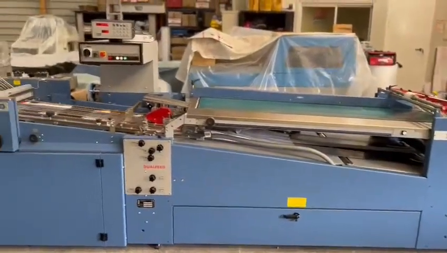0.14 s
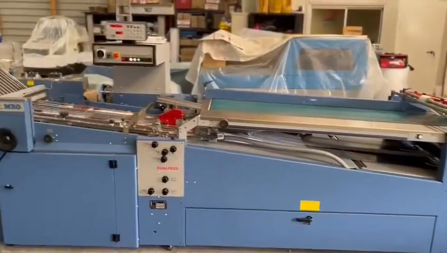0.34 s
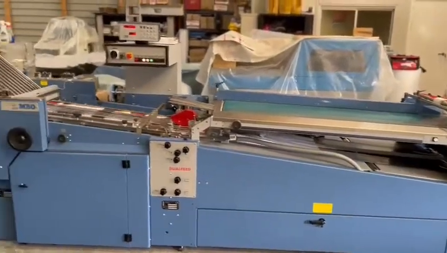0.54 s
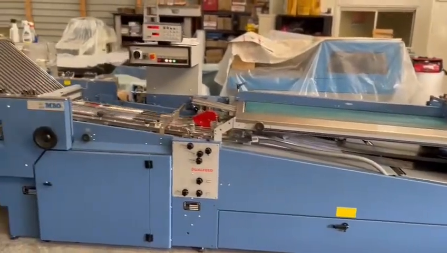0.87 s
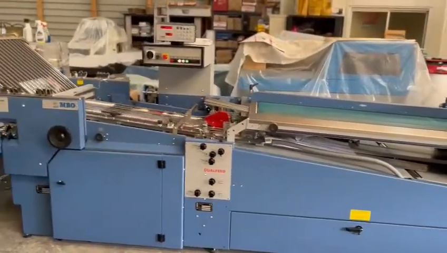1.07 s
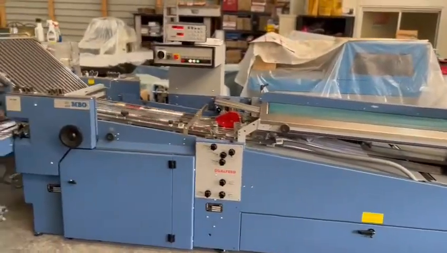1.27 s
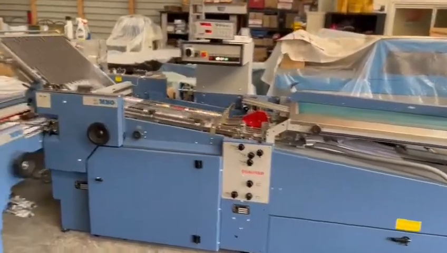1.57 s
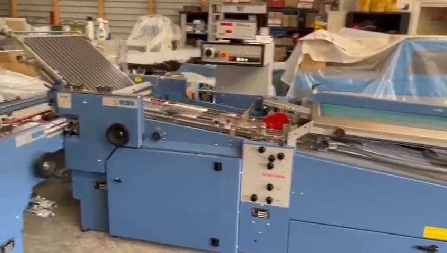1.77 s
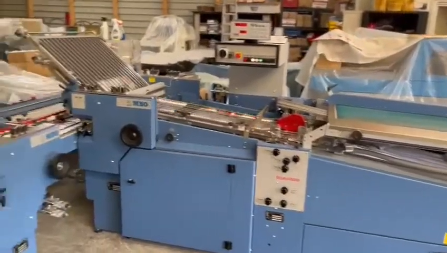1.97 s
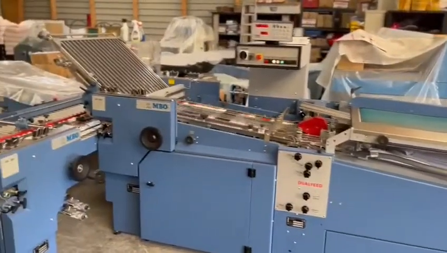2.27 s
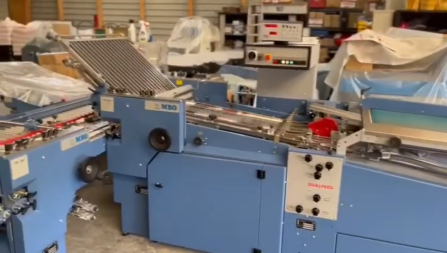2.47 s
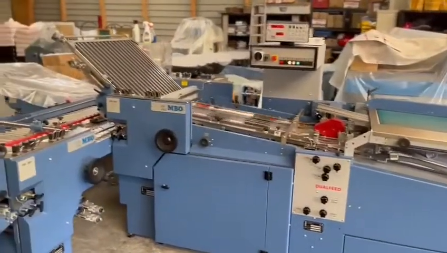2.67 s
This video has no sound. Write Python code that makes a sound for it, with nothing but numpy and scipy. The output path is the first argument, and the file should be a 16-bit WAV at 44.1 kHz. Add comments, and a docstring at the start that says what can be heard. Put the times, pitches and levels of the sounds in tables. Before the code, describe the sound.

A paper folding machine runs continuously in a workshop, each sheet hissing in, ticking, crackling and slapping plates about every 0.43 seconds, over clattering rollers, rattling bearings and motor hum; close stereo pickup with a diffuse room tail.

```python
"""A paper folding machine takes a sheet a little more than twice a second.
Each sheet is drawn in with a hiss of air, ticks, crackles through the rollers and slaps the plates: shaped noise.
Light clacks fall between sheets. Noise rattles make the rollers, belts and bearings, and ring the frame.
A wavering sine is the gears; narrow noise bands are the motor hum and some thin high tones; low noise is a rumble.
The level dips once, briefly."""
import sys
import numpy as np
from scipy import signal
from scipy.fft import rfft, irfft
from scipy.io import wavfile
from scipy.ndimage import uniform_filter1d

SR = 44100
rng = np.random.default_rng(int(sys.argv[2]) if len(sys.argv) > 2 else 0)


def wrap_up_sound(samples):
    """Save the sound to the file named by the first command line argument, as 16-bit audio."""
    columns = np.atleast_2d(samples).T
    # keep every value between -1 and 1, then stretch to whole-number steps
    tamed = np.clip(columns, -1, 1)
    steps = np.round(tamed * 32767).astype(np.int16)
    wavfile.write(sys.argv[1], SR, steps)


N = 123921  # length in samples


def undb(db):
    """Decibels to gain."""
    return 10 ** (np.asarray(db) / 20)


def unit(x):
    """Scale to rms 1."""
    return x / np.sqrt(np.mean(x ** 2))


def over_bins(points):
    """Join (f/Hz, value) points by straight lines on a log-frequency axis."""
    hz, value = np.array(points, float).T
    bin_hz = np.fft.rfftfreq(N, 1 / SR) + 1  # the 1 avoids log(0)
    return np.interp(np.log(bin_hz), np.log(hz), value)


def colour(x, spectrum):
    """Filter by the shape of a spectrum, keeping the power of white noise."""
    return irfft(rfft(x) * unit(undb(over_bins(spectrum))), N)


def noise():
    """Two unrelated white noises."""
    return rng.standard_normal((2, N))


def ring(x, resonances):
    """Drive resonances, each two equal stages in a row, and set each one's own level."""
    f = np.fft.rfftfreq(N, 1 / SR) + 1e-3
    driven = rfft(x)
    total = 0
    for hz, width, db in resonances:
        stage = 1 / (1 + .5j * hz / width * (f / hz - hz / f))
        total = total + undb(db) * unit(irfft(driven * stage ** 2, N))
    return total


def rattle(rate, spread_db, decay_s):
    """Dense random contacts of uneven size, each a short dying burst of noise; rms 1."""
    sizes = undb(spread_db * np.clip(rng.standard_normal(N), -2, 2))
    hits = (rng.random(N) < rate / SR) * sizes
    power = signal.lfilter([1], [1, -np.exp(-2 / (decay_s * SR))], hits ** 2)
    steady = .5 * power.mean()  # an even bed under the bursts
    return unit(noise() * np.sqrt(power + steady))


def envelope(age, attack_s, hold_s, release_s):
    """Rise in a straight line, hold until age hold_s, then die away."""
    return np.clip(age / attack_s, 0, 1) * np.exp(-np.maximum(age - hold_s, 0) / release_s)


def walk(rate):
    """Smooth random wandering with rms 1."""
    span = max(int(SR / rate), 2)
    once = uniform_filter1d(rng.standard_normal(N), span, mode="wrap")
    return unit(uniform_filter1d(once, span, mode="wrap"))


FLUTTER_DB, FLUTTER_PER_S = 2.5, 40
FLUTTER_CENTRES_HZ = (300, 600, 1000, 1500, 2200, 3200, 4600, 7000, 11000)


def flutter(x):
    """Split into overlapping bands and let each waver in level on its own."""
    spectrum = rfft(x)
    total = 0
    for pick in np.eye(len(FLUTTER_CENTRES_HZ)):  # one band at a time
        band = irfft(spectrum * over_bins(list(zip(FLUTTER_CENTRES_HZ, pick))), N)
        total = total + band * undb(FLUTTER_DB * walk(FLUTTER_PER_S))
    return total


# sheets entering the rollers: t/s, level/dB, time until the release/s, build-up/s
SHEETS = [(-.19, -0.5, 0.17, .04), (0.249, 0, .085, 0.025), (.692, .8, 0.11, 0.052),
          (1.106, -1, .14, 0.037), (1.566, 0.5, 0.11, 0.042), (1.989, -0.5, 0.14, 0.031),
          (2.414, 0.5, .11, 0.03)]
# tone of crackling paper: f/Hz, relative level/dB per Hz
PAPER = [(60, -34), (250, -6), (560, -5.5), (1000, -1), (1550, -1), (1800, -2.5), (2600, -4), (3900, -10),
         (5000, -14), (6500, -24), (8500, -47), (11500, -41)]
PAPER_DB, PAPER_RELEASE_S, PAPER_SAG_DB_PER_S = -20.5, 0.074, -7.5
CRACKLES_PER_S, CRACKLE_SPREAD_DB, CRACKLE_S = 1100, 1.5, 0.00076


def paper(t):
    """Each sheet crackles as it buckles, easing off as it runs through the fold rollers."""
    passing = 0
    for start, db, length, build in SHEETS:
        level_db = db + PAPER_SAG_DB_PER_S * (t - start - build)
        passing = passing + undb(level_db) * envelope(t - start, build, length, PAPER_RELEASE_S)
    crackle = passing * rattle(CRACKLES_PER_S, CRACKLE_SPREAD_DB, CRACKLE_S)
    return undb(PAPER_DB) * flutter(colour(crackle, PAPER))


# tone of the tick: f/Hz, relative level/dB per Hz
TICK = [(500, -2), (2000, 2), (4000, 0.5), (6000, 3.5), (7500, -7), (11500, -18)]
TICK_DB, TICK_RISE_S, TICK_DECAY_S = -25, 0.002, 0.008


def ticks(t):
    """A thin tick, a tiny noise burst, as each sheet's leading edge meets the rollers."""
    taps = sum(envelope(t - start, TICK_RISE_S, TICK_RISE_S, TICK_DECAY_S) for start, *_ in SHEETS)
    return undb(TICK_DB) * colour(taps * noise(), TICK)


# shared tone of smacks before tilt and ring: f/Hz, relative level/dB per Hz
SMACK = [(20, -67), (80, -36), (150, -18), (700, -7), (1600, 1), (2500, -1.5), (4000, -2), (5300, -11.5),
         (7000, -16.5), (11500, -37)]
SMACK_RISE_S, SMACK_DECAY_S, SMACK_PIVOT_HZ = 0.002, 0.01, 2200
SMACK_RING_DB, SMACK_RING_OCTAVES = 6, 0.2


def smacks(t, blows):
    """Short noise bursts, some dull, some bright, each stressing the pitch of the spot it strikes."""
    out, hz = 0, np.geomspace(20, 12000, 80)
    base = np.interp(np.log(hz), np.log(np.array(SMACK)[:, 0]), np.array(SMACK)[:, 1])
    for start, db, tilt, ring_hz in blows:
        tilted = base + tilt * np.log2(hz / SMACK_PIVOT_HZ)
        octaves_off = np.log2(hz / ring_hz)
        level = tilted + SMACK_RING_DB * np.exp(-(octaves_off / SMACK_RING_OCTAVES) ** 2)
        burst = envelope(t - start, SMACK_RISE_S, SMACK_RISE_S, SMACK_DECAY_S) * noise()
        out = out + undb(db) * colour(burst, list(zip(hz, level)))
    return out


# paper edges slapping plates and stops: t/s, level/dB, brightness tilt/dB per octave, ring f/Hz
SLAPS = [(0.279, 1, 0, 4000), (0.299, -3, 5, 2200), (.322, -1, 2, 5850), (.381, 0.5, 0.5, 4870),
         (.398, -3, -4, 2520), (.718, 2, -0.5, 4650), (.748, 1, -3.5, 3000), (.762, -4, 3, 3300),
         (.778, -2, -1, 4000), (0.796, -3, -3, 2000), (.824, -3, 3, 5300), (1.134, 0.5, 2.5, 5330),
         (1.158, -2, 2, 5000), (1.169, 4.5, -3, 2680), (1.196, 0.5, -4, 2300), (1.224, -9, -7, 3200),
         (1.251, -4, -8, 2300), (1.282, 0, -2, 4400), (1.592, 4.5, -3, 3330), (1.621, 5.5, -5.5, 2400),
         (1.637, -1, 0, 4230), (1.655, -3, 3, 3500), (1.673, -9, -1, 3330), (1.703, -4, 4, 4230),
         (2.015, 0.5, -2, 3700), (2.041, -1, -3, 4300), (2.054, 0, -8, 2700), (2.107, -10, -3, 2200),
         (2.139, 2.5, -7, 1700), (2.167, 2, -3.5, 5060), (2.176, -3, -5, 1150), (2.446, 4, -2, 3600),
         (2.468, 1, -1, 2180), (2.494, -7, -9, 4305), (2.520, 0.5, -7, 2580), (2.549, -2, -6.5, 2500),
         (2.58, -6, -10, 2760)]
SLAP_DB = -20.5


def slaps(t):
    """Paper edges smack the fold plates and stops."""
    return undb(SLAP_DB) * smacks(t, SLAPS)


# tone of the air: f/Hz, relative level/dB per Hz
AIR = [(1500, -32), (4000, -3), (5800, -6), (8500, 3), (11500, -7.5)]
AIR_DB, AIR_LEAD_S, AIR_HOLD_S, AIR_EDGE_S = -35, 0.086, 0.16, 0.024
AIR_GRAINS_PER_S, AIR_SPREAD_DB, AIR_GRAIN_S = 280, 7.5, 0.0049


def suction(t):
    """The feeder's air hisses and riffles the paper, starting just ahead of every sheet."""
    valve = sum(envelope(t - start + AIR_LEAD_S, AIR_EDGE_S, AIR_HOLD_S, AIR_EDGE_S)
                for start, *_ in SHEETS)
    return undb(AIR_DB) * colour(valve * rattle(AIR_GRAINS_PER_S, AIR_SPREAD_DB, AIR_GRAIN_S), AIR)


# light clacks between sheets: t/s, level/dB, brightness tilt/dB per octave, ring f/Hz
CLACKS = [(0.019, 3, 4, 4500), (0.444, -1, -4, 2200), (.563, 3.5, -2, 3500), (0.59, -1, 11, 2000),
          (.928, 5, -1.5, 1510), (1.405, -1, 9, 3430), (1.444, -2, 4, 2500), (1.483, -0.5, 5, 4540),
          (2.229, -6, -10, 2500), (2.723, -13, 0, 2000)]
CLACK_DB = -30.5


def clacks(t):
    """The mechanism clacks lightly: the same kind of smack, quieter."""
    return undb(CLACK_DB) * smacks(t, CLACKS)


# tone of rollers and belts: f/Hz, relative level/dB per Hz
ROLLERS = [(20, -30), (33, -28), (48, -14), (72, -13), (120, -8), (180, -3), (350, -5), (640, -7),
           (950, -1.5), (1180, -6), (1530, -1), (1750, -8), (2300, -11.5), (3100, -14), (4200, -13.5),
           (5000, -24), (7000, -22.5), (11500, -28)]
ROLLER_DB, ROLLER_FADE_DB_PER_S = -25.5, -0.39
CLATTERS_PER_S, CLATTER_SPREAD_DB, CLATTER_S = 550, 0.5, 0.0065


def rollers(t):
    """Rollers and belts clatter with dense small knocks, slowly growing softer."""
    clatter = colour(rattle(CLATTERS_PER_S, CLATTER_SPREAD_DB, CLATTER_S), ROLLERS)
    return undb(ROLLER_DB + ROLLER_FADE_DB_PER_S * t) * clatter


# resonances of frame and fold plates: f/Hz, width of one stage/Hz, level at t = 0/dB
FRAME = [(798, 60, -33), (882, 48, -36.5), (973, 35, -38), (1322, 57, -34.5), (234, 9.4, -40.5),
         (326.4, 14.5, -41.5), (445.4, 28, -41), (556, 24, -41.5), (1605, 50, -42.5), (2020, 28, -47.5),
         (3570, 120, -41.5)]
FRAME_FADE_DB_PER_S = -1.06


def frame(t):
    """A clatter of its own rings the frame and fold plates, slowly growing softer."""
    ringing = ring(rattle(CLATTERS_PER_S, CLATTER_SPREAD_DB, CLATTER_S), FRAME)
    return ringing * undb(FRAME_FADE_DB_PER_S * t)


# tone of the bearings: f/Hz, relative level/dB per Hz
BEARING = [(900, -14), (2000, 2), (3600, -1), (5000, -8), (7000, -11), (8500, -28), (11500, -15)]
BEARING_DB, BEARING_TICKS_PER_S, BEARING_SPREAD_DB, BEARING_TICK_S = -38, 70, 5, 0.0088


def bearings():
    """The roller bearings rattle unevenly all the time."""
    contacts = rattle(BEARING_TICKS_PER_S, BEARING_SPREAD_DB, BEARING_TICK_S)
    return undb(BEARING_DB) * flutter(colour(contacts, BEARING))


# middle pitch of the gear train: t/s, f/Hz
GEAR_PITCH = [(0, 811), (.55, 805), (1.1, 828.4), (1.5, 828), (2.8, 826)]
GEAR_DB, GEAR_WAVER_HZ, GEAR_WAVER_DB, GEAR_WAVER_PER_S = -38, 14, 4.5, 22


def gears(t):
    """The gear train sings on one drifting sine that wavers in pitch and strength."""
    hz = np.interp(t, *np.array(GEAR_PITCH).T) + GEAR_WAVER_HZ * walk(GEAR_WAVER_PER_S)
    tone = np.sin(2 * np.pi * np.cumsum(hz) / SR)
    return undb(GEAR_DB) * unit(tone * undb(GEAR_WAVER_DB * walk(GEAR_WAVER_PER_S)))


# motor hum: f/Hz, width of one stage/Hz, level/dB
HUM = [(92.1, 5.8, -45.5), (121.8, 8.5, -44.5)]


def hum():
    """The motor hums: noise through narrow low resonances."""
    return ring(noise(), HUM)


# level of the rumble: t/s, level/dB
RUMBLE_LEVEL = [(0.0, -30), (0.14, -35), (0.2, -42), (0.23, -34.5), (0.88, -36), (0.91, -29.5),
                (1.02, -36.5), (1.29, -34), (1.31, -43), (1.38, -32), (1.76, -38), (1.78, -33),
                (2.05, -29.5), (2.07, -42), (2.28, -31.5), (2.4, -42), (2.43, -34.5), (2.81, -35)]
# tone of the rumble: f/Hz, relative level/dB per Hz
RUMBLE = [(25, -30), (34, -23), (50, -6.5), (75, 1), (125, -2.5), (170, -6), (240, -12), (400, -19),
          (1000, -66)]
RUMBLE_DB = -0.5  # added to every level in the table


def rumble(t):
    """Low noise that swells and sinks."""
    return undb(RUMBLE_DB + np.interp(t, *np.array(RUMBLE_LEVEL).T)) * colour(noise(), RUMBLE)


# pitches of the thin high tones: f/Hz
HIGH_TONE_HZ = (7957, 9975, 10654, 10993, 11326)
# their levels, in the same order: level/dB
HIGH_TONE_DB = (-65, -62, -62, -59, -55.5)
HIGH_TONE_WIDTH_HZ = 16  # of one stage


def high_tones():
    """Faint thin tones in the high treble: noise through very narrow resonances."""
    return ring(noise(), [(hz, HIGH_TONE_WIDTH_HZ, db) for hz, db in zip(HIGH_TONE_HZ, HIGH_TONE_DB)])


ROOM_DB, ROOM_T60_S, ROOM_DELAY_S = -6.5, 0.99, 0.011


def workshop(x, t):
    """Add the room's diffuse tail: a dying noise that smears the sounds given to it."""
    tail = noise() * np.exp(-np.log(1000) * t / ROOM_T60_S) * (t > ROOM_DELAY_S)
    echo = signal.fftconvolve(x, unit(tail) / np.sqrt(N), axes=1)[:, :N]
    return x + undb(ROOM_DB) * echo


# likeness of left and right, limited to -1..1 in use: f/Hz, correlation
LIKENESS = [(60, .997), (125, 1), (250, 1), (450, 0.92), (800, 0.68), (1250, 0.36), (1560, -0.28),
            (1750, 0.53), (2350, 0.66), (3100, 0.17), (3800, 0.58), (6500, 0.55), (7300, -1.055),
            (9500, -1.108), (10400, 0.99)]
# left over right: f/Hz, level/dB
BALANCE_DB = [(100, 0), (350, 0.5), (700, 2.5), (1400, 0.4), (2800, 3), (5500, 2.5), (8500, 0),
              (11000, -1.5)]


def spread(x):
    """Mix two unrelated signals into left and right, as alike or opposed as the tables say at each pitch."""
    # alike in the bass, mixed in the middle, opposed around 7-9.5 kHz, alike at the top
    likeness, lean = np.clip(over_bins(LIKENESS), -1, 1), over_bins(BALANCE_DB)
    mid, side = rfft(x) * np.sqrt(np.array([1 + likeness, 1 - likeness]) / 2)
    # mostly leaning left
    return irfft(np.array([mid + side, mid - side]) * undb(np.array([lean, -lean]) / 2), N)


def scene():
    """Sheets, clacks and bearings with room tail, other machine sounds without; gears in the centre."""
    t = np.arange(N) / SR
    sheets = suction(t) + ticks(t) + paper(t) + slaps(t)
    knocks = clacks(t) + bearings()
    machine = rollers(t) + frame(t) + hum()
    return spread(workshop(sheets + knocks, t) + machine + rumble(t) + high_tones()) + gears(t)


DIP_S, DIP_DB = (.1906, .2126), -23  # start and end, depth
TOP_HZ = 11700


def record(dry):
    """The level dips for a moment, and a steep filter cuts the highest treble."""
    t = np.arange(N) / SR
    dip = np.where((t > DIP_S[0]) & (t < DIP_S[1]), undb(DIP_DB), 1.)
    gain = uniform_filter1d(dip, size=40)  # soften the edges
    lowpass = signal.ellip(10, .2, 90, TOP_HZ, fs=SR, output="sos")
    return signal.sosfilt(lowpass, dry * gain)


dry = scene()
out = record(dry)
wrap_up_sound(out)
```